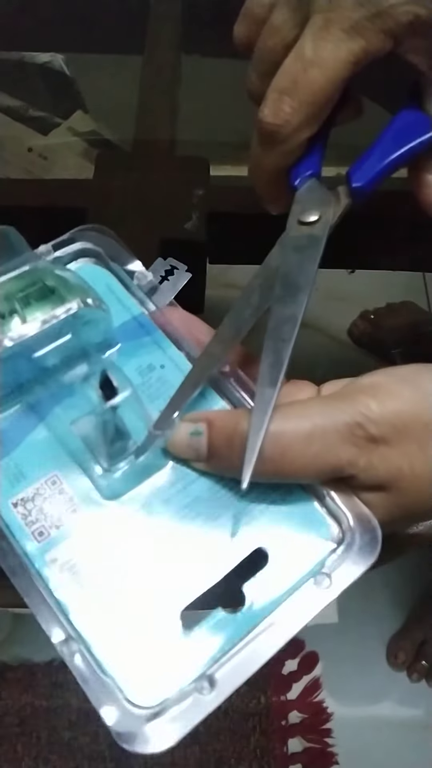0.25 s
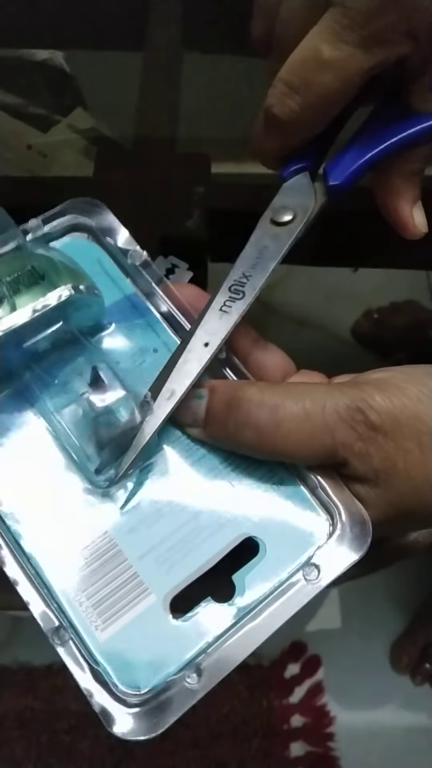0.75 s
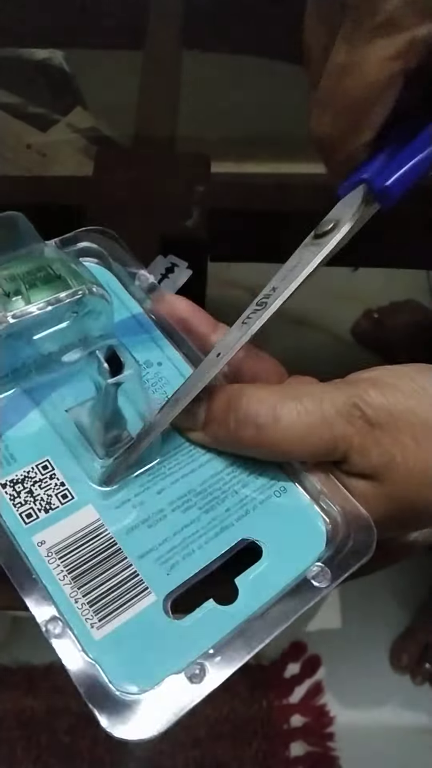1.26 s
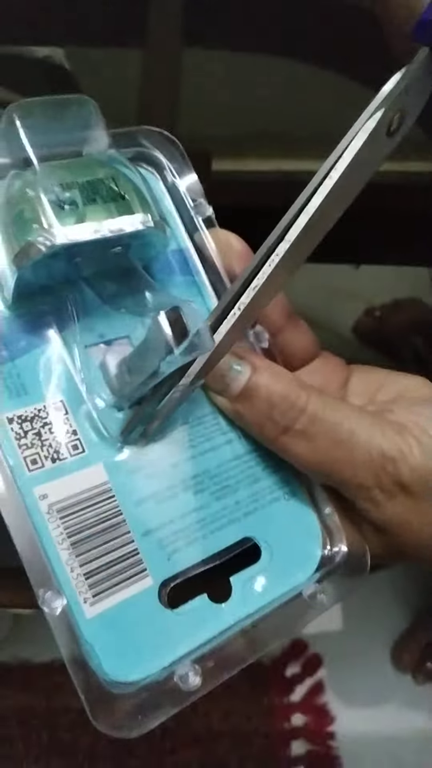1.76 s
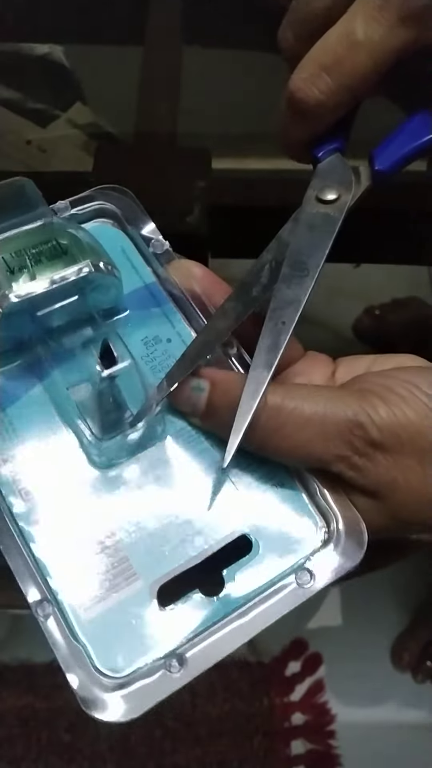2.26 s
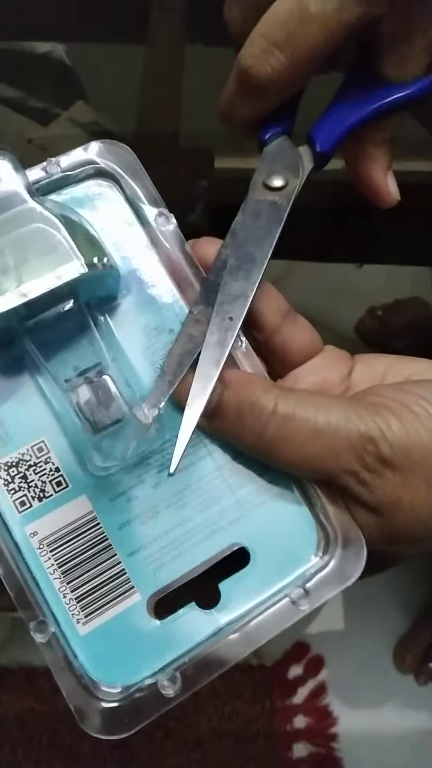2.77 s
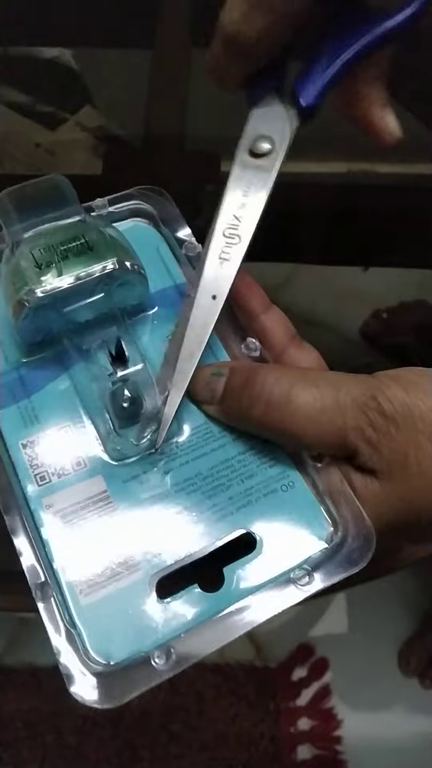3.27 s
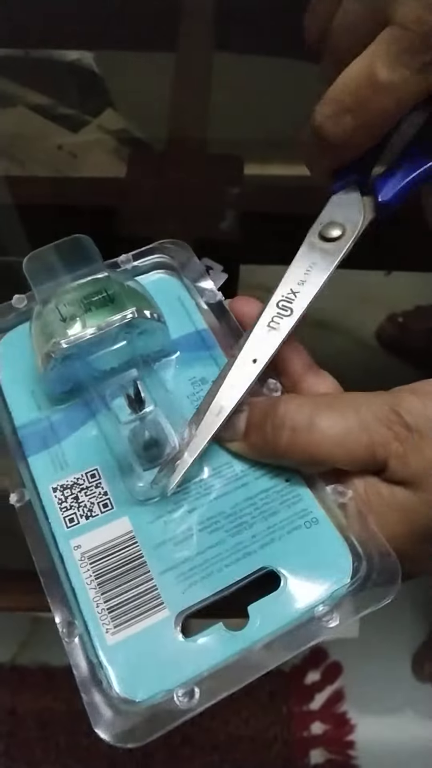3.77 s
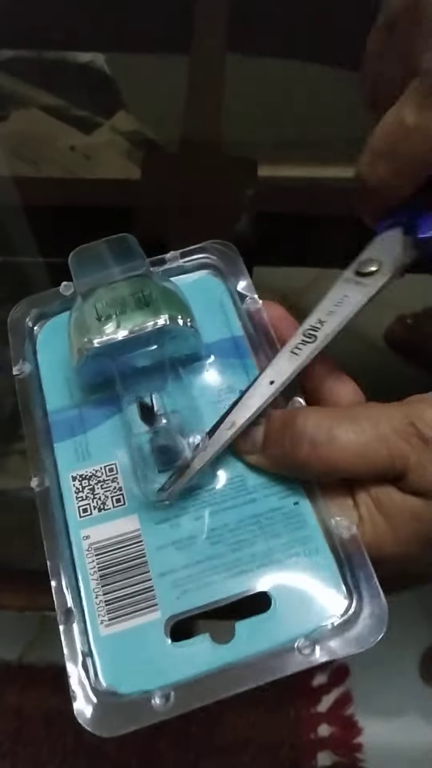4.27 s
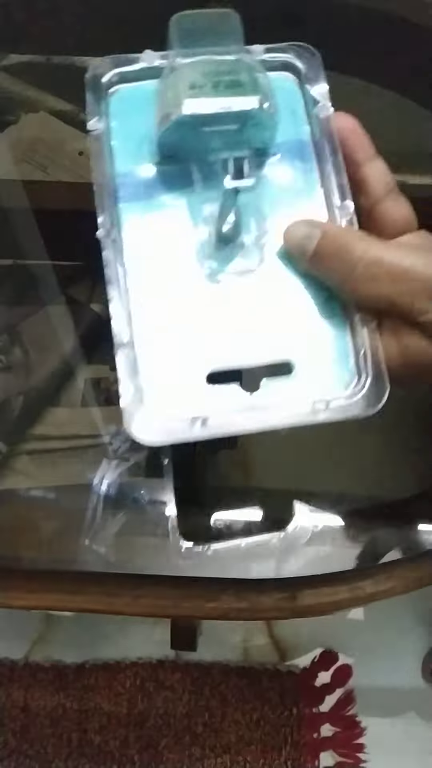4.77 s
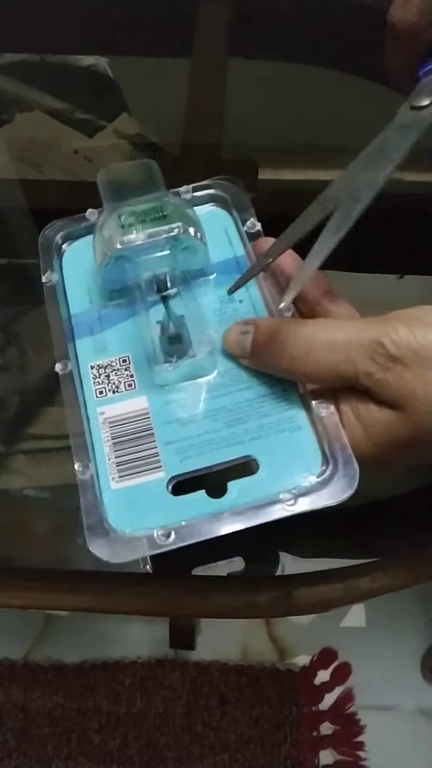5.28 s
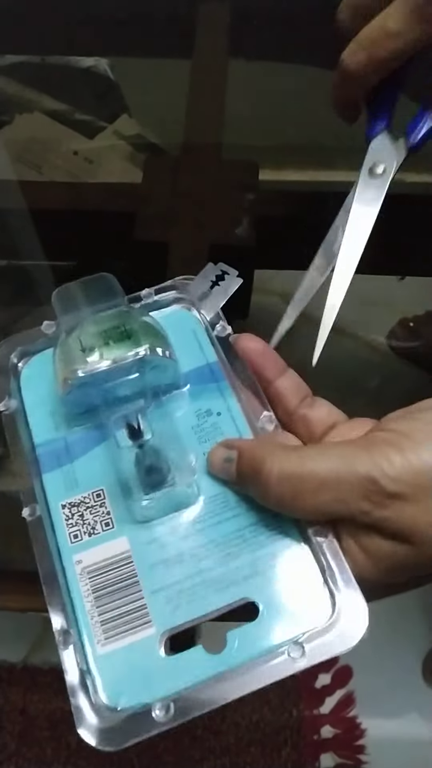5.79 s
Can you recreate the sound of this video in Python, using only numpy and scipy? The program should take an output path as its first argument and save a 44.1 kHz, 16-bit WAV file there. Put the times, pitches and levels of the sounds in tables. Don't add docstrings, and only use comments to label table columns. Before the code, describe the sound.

Very close scissors crunch through rigid plastic packaging: bright, hollow cracks in uneven bursts, hardest just after one second, with small splits and flexing pops between. A denser crunch comes past four and a half seconds, then near quiet, then a crisp snapping tear at the very end. A fan hums steadily, low air puffs buffet the stereo microphone, and thin high insects sing in a small furnished room.

```python
import sys
import numpy as np
from scipy import signal
from scipy.fft import rfft, irfft, next_fast_len
from scipy.io import wavfile
from scipy.ndimage import uniform_filter1d

SR = 44100
rng = np.random.default_rng(int(sys.argv[2]) if len(sys.argv) > 2 else 0)


def wav_out(sig):
    wavfile.write(sys.argv[1], SR, np.round(np.clip(np.atleast_2d(sig).T, -1, 1) * 32767).astype(np.int16))


def invert_db(x):
    u = np.asarray(x, float) / 20
    return 10 ** u


N = 265920

# centre in Hz, spread in Hz, t60 in ms, rise in ms,
# left minus right in dB, likeness of the ports (clipped to 0-1).
CARD_KNOCK = (742, 345, 16, 3, -2.5, 4)
SHELL_RING = (2320, 357, 19.6, 0.25, 0.72, 0.65)
CUT_EDGE = (4210, 1455, 12.7, 0.39, 5.9, 1.1)
SNAP_BAND = (10530, 5000, 7, 0.46, 0.55, 0.19)
# start in seconds, length in seconds, shell, hiss and card levels in dB.
TEAR_EVENTS = [(0.38, 0.031, -32, -45, -37), (1.153, 0.06, -49, -49, -39), (2.976, 0.028, -33.5, -50, -31),
               (3.37, 0.033, -34, -56, -54), (4.295, .07, -39, -62, -36.5), (4.596, 0.021, -18.5, -24, -28),
               (4.623, 0.032, -16, -29.5, -22.5), (5.922, 0.0026, -18.5, -21.5, -31),
               (5.971, .004, -15, -11, -29), (5.9886, 0.0053, -9.5, -6.5, -14.5),
               (6.007, .03, -24, -19.5, -45)]
# frequency in Hz, level in dB.
TEAR_SHELL_DB = [(500, -75), (1000, -24), (1500, -4.5), (2200, 4), (3200, 0), (4500, 0.5), (6000, -6),
                 (9000, -51)]
TEAR_HISS_DB = [(2500, -70), (4500, -43), (6500, 11.5), (9000, 14), (13000, 9), (16000, 5)]
TEAR_CARD_DB = [(100, -50), (500, 7.5), (1200, -3.5), (1600, -15.5), (4000, -93)]
# frequency in Hz, level in dB.
GUST_SPECTRUM_DB = [(15, -70), (33, -28), (48, -0.5), (70, 3.5), (110, -3), (170, -8.5), (300, -21),
                    (600, -36), (3000, -110)]
# centre in Hz, width in Hz, level in dB.
FAN_HUM_MODES = [(185, 21, -53), (239.8, 27, -55.5), (298, 24, -54), (350.4, 30, -56), (809, 157, -53.5)]
# frequency in Hz, likeness (up to 1).
FAN_LIKENESS = [(60, -0.08), (130, 1), (290, 1), (640, 0.49), (1410, 0.13), (3100, 0), (6820, 0),
                (15000, 0)]
# frequency in Hz, left minus right in dB.
PORT_BALANCE_DB = [(60, 4.5), (110, 19), (200, -0.5), (380, 4), (700, 0.5), (1290, 10), (2380, 4.5),
                   (4400, 6), (8120, -4), (15000, 1.5)]
# frequency in Hz, level in dB.
FAN_SPECTRUM_DB = [(40, -70), (100, -45), (150, -14.5), (300, -7.5), (600, -11.5), (800, -8.5),
                   (1000, -11.5), (1900, -13.5), (3000, -24), (5500, -31), (7300, -34), (10300, -39.5),
                   (14600, -33), (15600, -62)]
# centre in Hz, width in Hz, level in dB, throbs per second.
CHORUS_BANDS = [(6330, 470, -60, 100), (8060, 170, -66.5, 34), (9060, 780, -55, 24)]
# start in seconds, shell peak in dB, shell ring in Hz,
# snap over shell in dB, card knock over shell in dB.
BLADE_BITES = [(0.0112, -22.5, 1830, -3, -33), (0.1146, -21.5, 2140, -8, -7.5),
               (0.3439, -12.5, 1854, -12.5, -23), (0.6569, -23, 2200, 8, -21), (1.136, -10, 2120, -11, -22),
               (1.1514, 0.5, 1890, -17.5, -40), (1.1614, -5.5, 2025, -15, -24),
               (1.2107, -10, 2100, -9.5, -17), (1.4415, -16.5, 2074, -2, -28),
               (1.6473, -5.5, 2175, -9, -20.5), (1.7872, -20.5, 2100, 4.5, -14),
               (2.5172, -16.5, 2520, -7.5, -25), (2.632, -11, 2140, -9.5, -16),
               (2.7175, -12, 2100, -7.5, -21), (3.0115, -5, 2246, -6.5, -26),
               (3.361, -6.5, 2190, -9.5, -23.5), (3.3713, -7.5, 2244, -35, -42),
               (3.7609, -13.5, 1890, 0.5, -14), (3.7788, -10, 2120, -10.5, -26),
               (3.9905, -6.5, 1907, -10, -18), (4.357, -11.5, 2030, -4.5, -25),
               (4.5899, -6.5, 2230, -9, -23), (4.6103, -5, 2293, -4, -19), (4.6513, -12.5, 1846, -2.5, -30)]
# start in seconds, shell peak in dB,
# cut edge over shell in dB, snap over shell in dB.
SHELL_SPLITS = [(.1205, -25.5, 4, 2), (0.1792, -42.5, 6.5, 5), (0.6245, -35.5, -6, -6),
                (1.7374, -40, -1, -1), (1.81, -17, -5, -21), (2.0455, -36, -5, 2), (2.098, -20.5, -2.5, -4),
                (2.4432, -23.5, -6.5, 2), (2.472, -46, 6, 6), (2.4904, -29.5, -7, 6), (2.5662, -24, 2, 1.5),
                (2.5951, -20, 0, -1), (2.6149, -51, -1, 14), (2.7053, -26.5, -7, 1.5),
                (2.9806, -31, 6.5, 8), (2.9924, -34, 10, 6), (3.007, -21.5, 4.5, 0), (3.738, -51, 10, 10),
                (3.7468, -31.5, 4, -2.5), (4.343, -27, 7.5, 0.5), (4.5745, -31, -2, 0), (4.624, -37, 19, 2),
                (4.6332, -33, 22, 15), (4.6796, -31, 4, 2), (4.806, -40.5, 4, 3), (5.773, -31, 4, 9.5),
                (5.8032, -31, -12, -1), (5.9212, -30.5, -10, 22.5), (5.971, -15.5, 0, 12),
                (5.9888, -19, -10, -1)]
# start in seconds, shell peak in dB,
# cut edge over shell in dB, card knock over shell in dB.
SHELL_POPS = [(0.0907, -40, -4, -2), (0.189, -31, -14, -28), (0.3701, -24.5, -17, -29),
              (0.384, -28, -13, -19), (0.4025, -18, -9, -11.5), (0.4117, -23.5, -5, -20),
              (0.4222, -27, -17, -18), (0.4932, -29, -22, -16), (0.886, -34.5, -18, -10),
              (0.9158, -39, -4, -7), (1.2434, -34, -17, -8), (1.3419, -33, -6.5, -17), (1.598, -43, -3, 2),
              (1.6624, -22, -9, -34), (2.0665, -35, -2, -11), (2.0792, -23.5, -11.5, -10),
              (2.2243, -25, -12, -18), (2.2294, -37, 3, -22), (2.9985, -15, -11, -28),
              (3.3933, -21, -8.5, -18), (3.4258, -30, -5, -11), (4.0016, -30, 1, -8),
              (4.1315, -18, -22, -15.5), (4.1774, -34, -7.5, -2.5), (4.3002, -19.5, -12, -17),
              (4.3238, -22, -7, -19), (4.4114, -27.5, -15, -5), (4.6604, -23, -2, -11),
              (5.5197, -31.5, -7, -25), (5.6785, -40, -3, -2)]
# shell, cut edge, snap and card knock, all in dB.
CRACK_PART_GAINS_DB = (4.17, 4.8, 7.8, 5.7)
# peak time in seconds, peak in dB, left minus right in dB, decay in dB per second.
AIR_PUFFS = [(0.454, -31, 12, 55), (0.718, -34, 15, 112), (1.06, -49, 16, 150), (1.36, -46, 2, 30),
             (1.631, -23.5, 34, 250), (1.71, -34.5, 25, 400), (1.95, -43.5, 19, 46), (2.27, -52, 13, 34),
             (3.09, -40, 17, 190), (3.36, -36, 20, 20), (3.478, -34, 22, 177), (3.78, -53, 8, 400),
             (3.86, -36.5, 15, 178), (4.0, -50, 16, 10), (4.15, -34.5, 41, 300), (4.299, -30, 19, 88),
             (4.38, -36.5, 13, 72), (4.64, -44, -10, 27), (4.87, -40, 13, 182), (4.95, -42, 18, 300),
             (5.06, -26.5, 25, 154), (5.21, -36, -2, 80), (5.32, -36, 14, 109), (5.37, -35.5, 2, 182),
             (5.56, -56, 3, 120), (5.84, -51, -3, 140), (5.93, -40, 20, 100), (5.99, -34, -15, 300)]

FAN_DB = -44
CHIRP_START_S, CHIRPS_PER_S, CHIRP_S = 0.0248, 11.405, 0.028
DRAUGHT_DB, DRAUGHT_PAN_DB, PUFF_RISE_DB_PER_S = -53, 3, 600
ROOM_T60_S, ROOM_DB = 0.37, -18.5
LEFT_LAG_SAMPLES = 8
LEFT_PORT_HZ, LEFT_PORT_WIDTH_HZ, LEFT_PORT_GAIN = 2230, 480, 2.2
TEAR_ATTACK_S, TEAR_FADE_DB_PER_S = 0.0015, 698
TEAR_CROWDING = 20
GRAINS_PER_S, GRAIN_SPREAD_DB = 2800, 4.5
BITE_EDGE_DB, BITE_EDGE_PER_SNAP = -2.5, 0.3
SPLIT_KNOCK_DB, POP_SNAP_UNDER_EDGE_DB = -19.5, 7.5
RING_HZ, RING_HZ_PER_SNAP_DB = 2262, 13
CRACK_SAMPLES = 1024


def level(x, db):
    return x * invert_db(db) / np.sqrt(np.mean(x ** 2))


def read(table, hz):
    table_hz, value = np.array(table).T
    return np.interp(np.log(hz + 1), np.log(table_hz), value)


def colour(x, db_of):
    size = next_fast_len(N + 4096)
    hz = np.arange(size // 2 + 1) * SR / size
    return irfft(rfft(x, size) * invert_db(db_of(hz)), size)[..., :N]


def hump(hz, centre_hz, width_hz):
    return -20 * np.log10(1 + (2 * (hz - centre_hz) / width_hz) ** 2)


def walk(rate_hz):
    hold = int(SR / rate_hz)
    steps = np.repeat(rng.standard_normal(N // hold + 1), hold)
    return 0.8 * uniform_filter1d(uniform_filter1d(steps, hold), hold)[:N]


def pair(alike):
    mid, side = rng.standard_normal((2, N))
    share = np.clip(alike, 0, 0.99)
    opposed = side * np.array([[1], [-1]])
    return (np.sqrt(1 + share) * mid + np.sqrt(1 - share) * opposed) / np.sqrt(2)


def insects():
    t = np.arange(N) / SR
    far = 0
    for centre_hz, width_hz, db, throb_hz in CHORUS_BANDS:
        band = colour(pair(0.047), lambda hz: hump(hz, centre_hz, width_hz))
        far = far + level(band, db) * invert_db(1.3 * walk(throb_hz))
    phase = ((t - CHIRP_START_S) * CHIRPS_PER_S % 1) / (CHIRPS_PER_S * CHIRP_S)
    shape = np.sin(np.pi * np.clip(phase, 0, 1)) ** 2 * invert_db(2.9 * walk(10))
    pitch_hz = 9560 - 750 * phase.clip(0, 1)
    chirp = shape * np.sin(2 * np.pi * np.cumsum(pitch_hz) / SR)
    return far + chirp * invert_db(np.array([[-54], [-44]]))


def fan():
    air, swell = 0, walk(0.2)
    for centre_hz in 150 * 2 ** np.arange(0, 7.):
        noise = pair(read(FAN_LIKENESS, centre_hz) + 0.07)
        band = colour(noise, lambda hz: read(FAN_SPECTRUM_DB, hz) - 12 * np.log2((hz + 1) / centre_hz) ** 2)
        air = air + band * invert_db(0.9 * swell + 1.8 * walk(9))
    noise, hum = pair(0.93), 0
    for mode_hz, width_hz, db in FAN_HUM_MODES:
        mode = colour(noise, lambda hz: hump(hz, mode_hz, width_hz))
        hum = hum + level(mode, db) * invert_db(4.0 * walk(8))
    return level(air, FAN_DB) + hum


def gusts():
    t = np.arange(N) / SR
    rows = [(DRAUGHT_DB + 0 * t, DRAUGHT_PAN_DB)]
    for s, peak_db, pan_db, fall_db_per_s in AIR_PUFFS:
        slope_db = np.minimum(PUFF_RISE_DB_PER_S * (t - s), abs(fall_db_per_s) * (s - t))
        rows.append((peak_db + slope_db, pan_db))
    power = sum(invert_db(2 * db) / (1 + invert_db(np.array([[-2], [2]]) * pan_db)) for db, pan_db in rows)
    air = []
    for _ in range(2):
        lumpy = rng.standard_normal(N) * invert_db(2.4 * walk(25.09))
        air.append(level(colour(lumpy, lambda hz: read(GUST_SPECTRUM_DB, hz)), 7.13))
    return np.array(air) * np.sqrt(power)


def room(x):
    t = np.arange(int(0.4 * SR)) / SR
    noise = rng.standard_normal((2, len(t)))
    soft = signal.lfilter([0.35], [1, -0.65], noise)
    treble = 0.3 * (noise - soft) * invert_db(-60 * t / (0.55 * ROOM_T60_S))
    tail = soft * invert_db(-60 * t / ROOM_T60_S) + treble
    tail *= np.clip((t - 0.002) / 0.0069, 0, 1)
    tail *= invert_db(ROOM_DB) / np.sqrt(np.sum(tail[0] ** 2))
    return signal.fftconvolve(x, tail, axes=1)[:, :N]


def tears():
    t = np.arange(N) / SR
    gains = np.zeros((3, N))
    for s, length_s, *parts_db in TEAR_EVENTS:
        fade = invert_db(-TEAR_FADE_DB_PER_S * np.maximum(t - s - length_s, 0))
        shape = np.clip((t - s) / TEAR_ATTACK_S, 0, 1) * fade
        gains += shape * invert_db(np.array(parts_db))[:, None]
    crowd = 1 + TEAR_CROWDING * gains[1]
    hits = rng.random(N) < crowd * GRAINS_PER_S / SR
    size = hits / crowd ** 0.84 * invert_db(GRAIN_SPREAD_DB * rng.exponential(size=N).clip(0, 3))
    grains = pair(0.14) * (0.073 + signal.lfilter([1], [1, -0.97], size))
    bodies = [(TEAR_SHELL_DB, -7, SHELL_RING), (TEAR_HISS_DB, -3, SNAP_BAND), (TEAR_CARD_DB, -6, CARD_KNOCK)]
    out = 0
    for gain, (spectrum, db, part) in zip(gains, bodies):
        sound = level(colour(grains, lambda hz: read(spectrum, hz)), db)
        out = out + gain * sound * invert_db(np.array([[0.5], [-0.5]]) * part[4])
    return out


def burst(sound, t60_ms, rise_ms, pan_db):
    ms = np.arange(CRACK_SAMPLES) * 1000 / SR
    fade = invert_db(-60 * ms / np.clip(t60_ms, 4, 30))
    sound = sound * fade * (1 - np.exp(-ms / np.clip(rise_ms, 0.1, 3)))
    peak = np.abs(sound).max(axis=1, keepdims=True)
    return sound.imag / peak * invert_db(np.array([[0.5], [-0.5]]) * pan_db)


def ring(chance, hz, spread_hz, t60_ms, rise_ms, pan_db, alike):
    mode_hz = np.abs(hz + spread_hz * np.clip(chance[0], -1.5, 1.5))[:, None]
    share = np.clip(alike, 0, 1)
    common = chance[1] + 1j * chance[2]
    own = chance[3:5] + 1j * chance[5:7]
    strength = np.sqrt(share) * common + np.sqrt(1 - share) * own
    modes = np.exp(2j * np.pi * mode_hz * np.arange(CRACK_SAMPLES) / SR)
    return burst(strength @ modes, t60_ms, rise_ms, pan_db)


def fracture(chance, slope_db_per_khz, hz, spread_hz, t60_ms, rise_ms, pan_db, alike):
    share = np.clip(alike, 0, 1)
    noise = np.sqrt(share) * chance[0] + np.sqrt(1 - share) * chance[1:]
    off_hz = np.arange(CRACK_SAMPLES // 2 + 1) * SR / CRACK_SAMPLES - hz
    band = np.exp(-(off_hz / spread_hz) ** 6) * invert_db(slope_db_per_khz * off_hz / 1000)
    return burst(np.fft.ifft(rfft(noise) * band, CRACK_SAMPLES), t60_ms, rise_ms, pan_db)


def crack_rows():
    rows = []
    for s, db, hz, snap, knock in BLADE_BITES:
        rows.append((s, db, hz, BITE_EDGE_DB + BITE_EDGE_PER_SNAP * snap, snap, knock))
    small = [(s, db, edge, snap, SPLIT_KNOCK_DB) for s, db, edge, snap in SHELL_SPLITS]
    small += [(s, db, edge, edge - POP_SNAP_UNDER_EDGE_DB, knock) for s, db, edge, knock in SHELL_POPS]
    for s, db, edge, snap, knock in small:
        rows.append((s, db, RING_HZ + RING_HZ_PER_SNAP_DB * snap, edge, snap, knock))
    return [(s, hz, *(db + np.array([0, *over]) + CRACK_PART_GAINS_DB)) for s, db, hz, *over in rows]


def cracks():
    out = np.zeros((2, N + CRACK_SAMPLES))
    rows = crack_rows()
    modes = rng.standard_normal((len(rows), 2, 7, 20))
    noise = rng.standard_normal((len(rows), 2, 3, CRACK_SAMPLES))
    for (s, shell_hz, *parts_db), mode, spit in zip(rows, modes, noise):
        shell = ring(mode[0], shell_hz + SHELL_RING[0] - 2250, *SHELL_RING[1:]) * invert_db(-3)
        edge = fracture(spit[0], -1.8, *CUT_EDGE)
        reach_db_per_khz = np.clip(-2.0 + 0.13 * (parts_db[2] - parts_db[1]), -3.5, 0.3)
        snap = fracture(spit[1], reach_db_per_khz, *SNAP_BAND)
        knock = ring(mode[1], *CARD_KNOCK)
        start = max(int((s - 0.0003) * SR), 0)
        parts = zip(parts_db, [shell, edge, snap, knock])
        out[:, start:start + CRACK_SAMPLES] += sum(invert_db(db) * part for db, part in parts)
    return out[:, :N]


def scene():
    pack = cracks() + tears()
    left, right = pack
    b, a = signal.iirpeak(LEFT_PORT_HZ, LEFT_PORT_HZ / LEFT_PORT_WIDTH_HZ, fs=SR)
    cavity = signal.lfilter(b, a, left)
    direct = np.array([np.roll(left + LEFT_PORT_GAIN * cavity, LEFT_LAG_SAMPLES), right])
    pack = direct + room(pack) * invert_db(np.array([[3], [0]]))
    air_left, air_right = fan()
    air_left = colour(air_left, lambda hz: read(PORT_BALANCE_DB, hz) / 2)
    air_right = colour(air_right, lambda hz: -read(PORT_BALANCE_DB, hz) / 2)
    return pack + np.array([air_left, air_right]) + insects() + gusts()


def roll_off(x):
    return signal.sosfilt(signal.butter(12, 16810, fs=SR, output="sos"), x)


def record(dry):
    top_cut = signal.ellip(8, 0.2, 70, 16100, fs=SR, output="sos")
    ceiling = 0.82
    rounded = ceiling * np.tanh(dry / ceiling)
    return roll_off(signal.sosfilt(top_cut, rounded))


dry = scene()
out = record(dry)
wav_out(out)
```